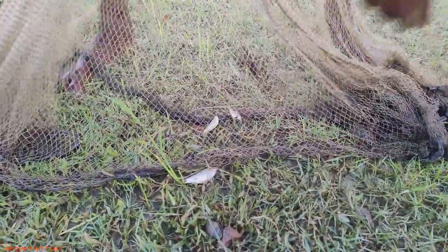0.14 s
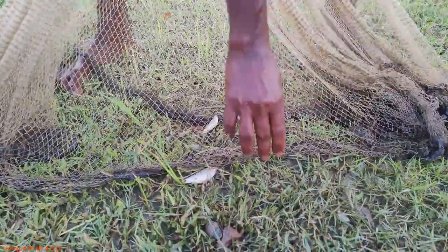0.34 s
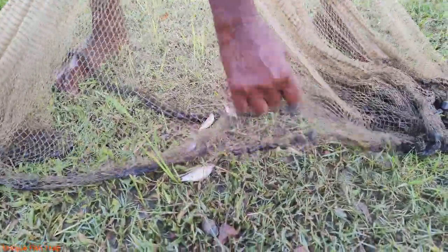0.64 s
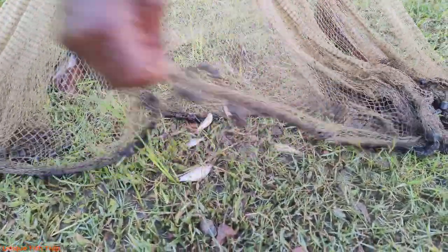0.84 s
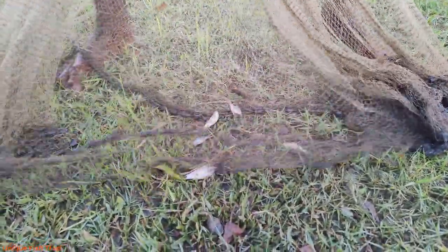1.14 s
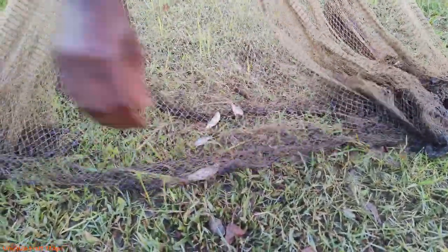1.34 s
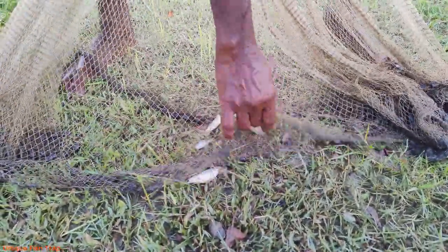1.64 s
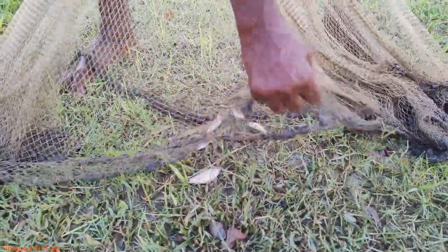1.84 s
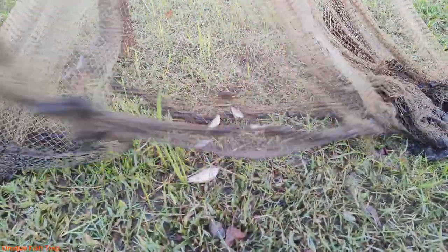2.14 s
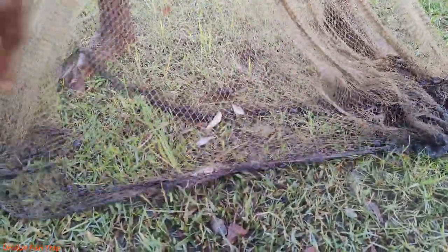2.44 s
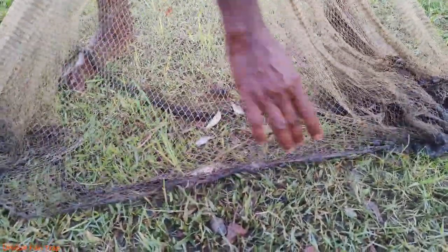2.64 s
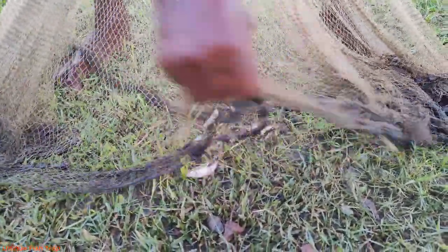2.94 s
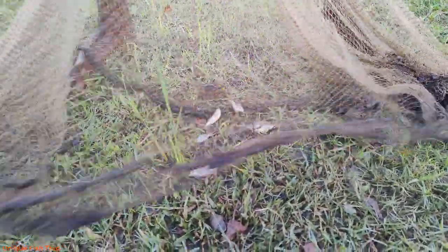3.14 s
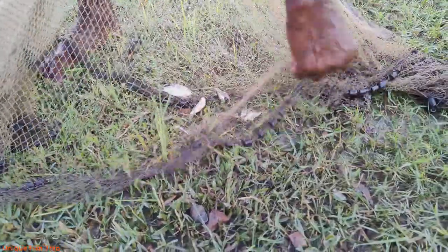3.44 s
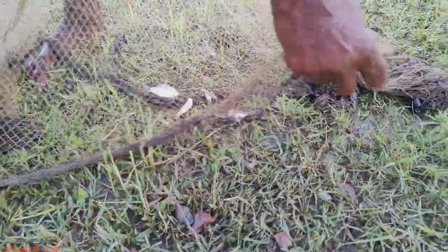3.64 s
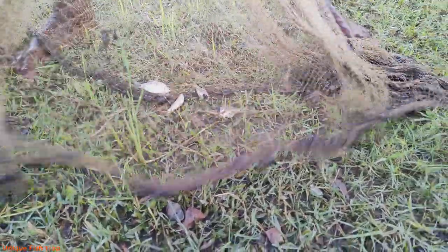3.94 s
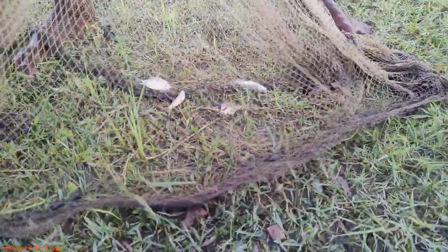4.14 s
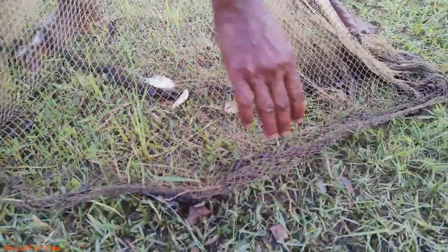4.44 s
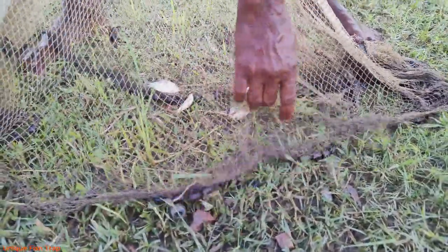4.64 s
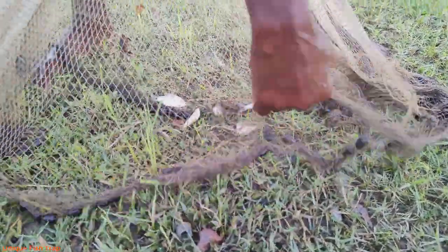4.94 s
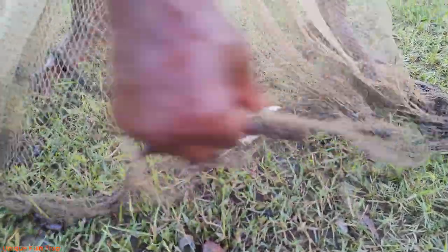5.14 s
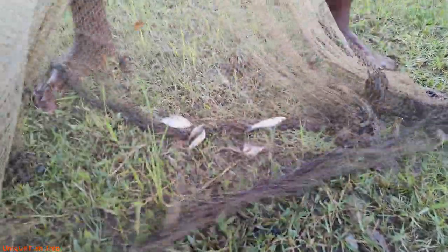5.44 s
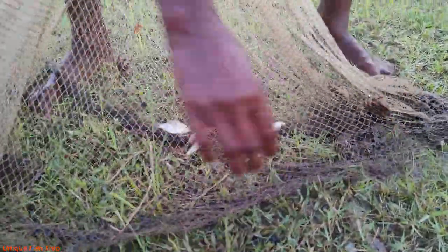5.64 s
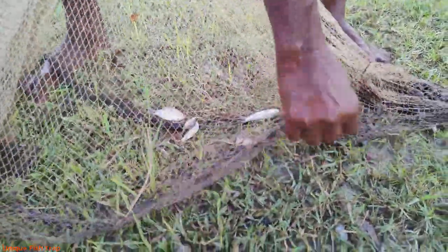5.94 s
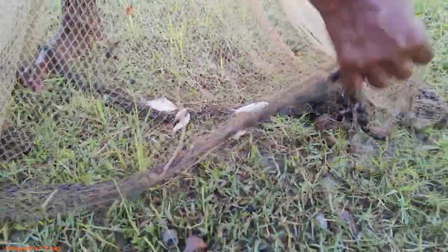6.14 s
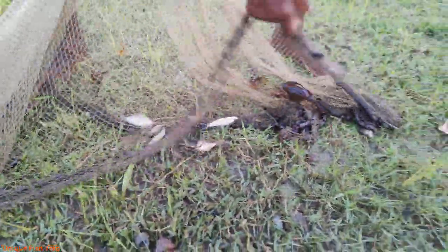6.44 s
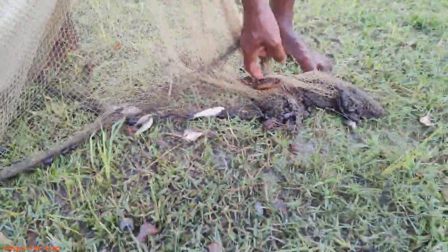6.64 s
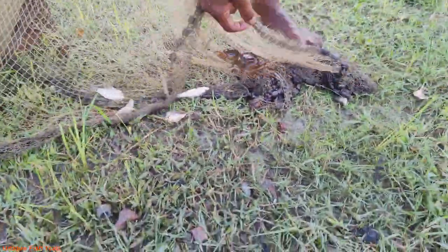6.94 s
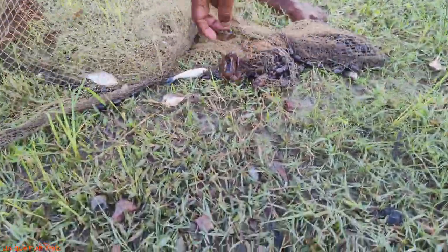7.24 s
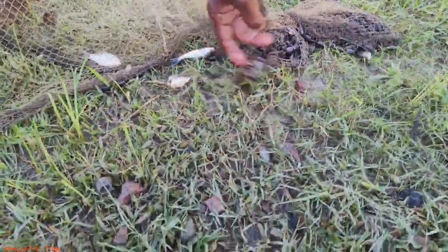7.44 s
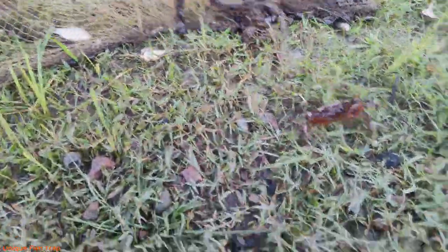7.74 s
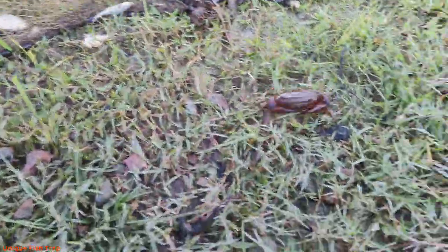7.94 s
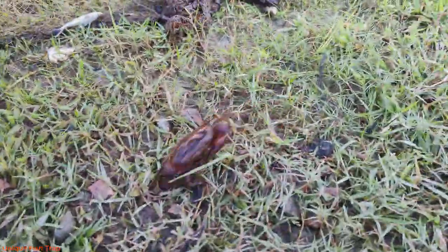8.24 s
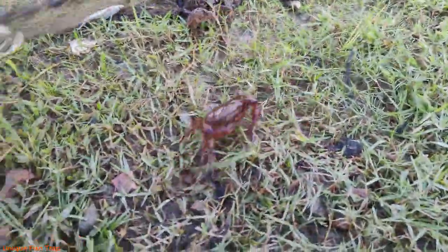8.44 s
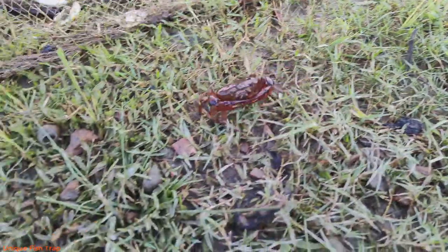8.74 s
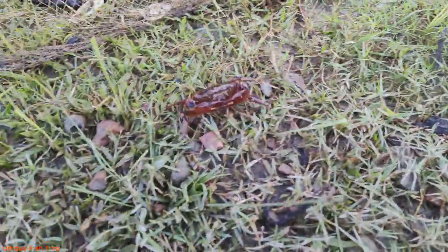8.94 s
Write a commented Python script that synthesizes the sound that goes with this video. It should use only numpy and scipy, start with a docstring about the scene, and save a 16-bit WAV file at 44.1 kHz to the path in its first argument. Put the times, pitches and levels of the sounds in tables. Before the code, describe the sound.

A wet nylon cast net is lifted and shaken by hand over grass, crackling and snapping sharply, with hard knocks and birds chirping around.

```python
"""Close by a two-port microphone, a hand lifts and shakes a wet cast net over grass for nine seconds.
Throughout, filtered noise gives low rumble, air and a high insect hiss; gliding tones make birds near and far.
Noise bursts snap from the first second and crowd near 1.4 s; a warble of swept tone follows at 1.6 s.
Pulls of rustling noise and snaps return near 2.6 s, with damped rings knocking hard at 4.3 and 5.7 s.
Air thumps a port as short swings at 6.7 and 8.1 s, stray ticks touch one side, and dense snaps end it."""
import sys
import numpy as np
from scipy import signal
from scipy.fft import rfft, irfft, next_fast_len
from scipy.io import wavfile
from scipy.ndimage import uniform_filter1d

SR = 44100
rng = np.random.default_rng(int(sys.argv[2]) if len(sys.argv) > 2 else 0)


def to_wav(s):
    """Save 16-bit WAV."""
    ch = np.atleast_2d(s).T  # columns
    pcm = np.round(np.clip(ch, -1, 1) * 32767)  # PCM
    wavfile.write(sys.argv[1], SR, pcm.astype(np.int16))


N = 400869

# Spectrum of the open air around the microphone: (frequency [Hz], relative density [dB per Hz])
FIELD_SPECTRUM = [(15, -37), (25, -0.5), (70, 3), (157, -2), (427, -19), (1190, -28.5), (2480, -23.5),
                  (3250, -17), (4140, -23.5), (5140, -33), (10700, -26.5), (11900, -42), (16000, -30)]
# Far birds: (time [s], level [dB])
FAR_BIRD_LEVEL = [(0.0, -31.5), (0.2, -53.5), (0.55, -56.5), (1.07, -38.5), (1.45, -47), (1.68, -54),
                  (1.9, -42.5), (2.79, -37.5), (3.1, -52), (3.47, -35), (3.87, -52), (4.3, -34.5),
                  (4.54, -44.5), (4.88, -39), (5.65, -39.5), (5.95, -45.5), (6.68, -40), (7.74, -40.5),
                  (7.93, -43), (8.75, -31.5), (8.87, -50), (9.09, -50)]
# Near birds: (start [s], end [s], first pitch [Hz], last pitch [Hz],
# bend [exponent, above 1 glides early], level before flutter and echo [dB])
NEAR_WHISTLES = [(0.016, 0.102, 3230, 2652, 2.4, -38), (.045, 0.069, 3430, 3530, 1.1, -48),
                 (0.53, 0.577, 4330, 4270, 1.1, -49), (.68, 0.747, 3530, 3320, 1.4, -49),
                 (0.794, 0.81, 3320, 3240, 1.1, -51), (0.802, 0.916, 2190, 2910, 0.86, -43),
                 (1.025, 1.085, 4180, 3560, 0.93, -38), (0.951, 0.988, 2625, 2910, 0.71, -39),
                 (1.82, 1.905, 4870, 3980, 0.94, -38), (1.814, 1.887, 4250, 3420, 0.55, -39.5),
                 (2.506, 2.532, 5100, 4200, 1.1, -38), (2.529, 2.592, 4200, 3830, 3.6, -28.5),
                 (2.688, 2.743, 5660, 4500, 0.97, -40.5), (2.735, 2.813, 4330, 3727, 6.9, -30),
                 (2.77, 2.797, 4500, 4900, 1.1, -40), (2.714, 2.763, 3000, 2830, 1.16, -38),
                 (2.8, 2.863, 3500, 3174, 4.2, -27.5), (2.882, 2.959, 5820, 4500, .7, -42.5),
                 (2.944, 3.021, 4500, 3660, 5.5, -34.5), (3.498, 3.56, 3540, 3100, 1.7, -40),
                 (4.71, 4.75, 4870, 4800, 1.1, -55), (4.848, 4.903, 3080, 2730, 1.27, -35.5),
                 (4.928, 4.947, 4220, 4600, 1.2, -37), (4.951, 5.02, 3450, 3080, 2.4, -30.5),
                 (5.19, 5.226, 2750, 2890, 1.3, -39), (5.818, 5.845, 5200, 6000, 2.1, -45.5),
                 (5.846, 5.981, 5990, 3530, 1.5, -46), (5.846, 5.923, 3010, 2910, 0.5, -42),
                 (6.09, 6.195, 2950, 3940, 0.88, -40.5), (6.615, 6.737, 2804, 3630, 1.14, -41),
                 (7.351, 7.42, 3040, 3100, 1.4, -47.5), (7.668, 7.749, 4580, 3005, 2.4, -37.5),
                 (7.887, 7.932, 4720, 4680, 0.39, -41.5), (8.065, 8.097, 4400, 4500, 0.94, -43),
                 (8.246, 8.307, 3195, 3030, 0.9, -34), (8.862, 8.935, 3930, 4020, 1.24, -49)]
# One low warble: (start [s], end [s], period [s], top [Hz], bottom [Hz], final level before flutter and echo [dB])
WARBLE = (1.609, 1.757, .037, 3400, 2080, -43.5)
# Air on the ports: (time [s], strength [dB], swing [Hz], left minus right [dB])
AIR_PUFFS = [(1.077, -31, 120, -10), (4.248, -31, 186, -1), (5.601, -25, 153, -4), (5.683, -25.5, 157, -14),
             (6.641, -26, 120, -16), (6.658, -21, 202, -24), (6.677, -29, 120, -18),
             (6.797, -27.5, 211, -16), (6.82, -22, 151, -28), (8.052, -35.5, 120, -12),
             (8.079, -25.5, 132, -22), (8.101, -22.5, 120, -24), (8.125, -27, 143, -19),
             (8.15, -22, 259, -20), (8.172, -23, 170, -25), (8.686, -21.5, 179, -4), (8.868, -31, 88, -8)]
# Droplets or grit flicked onto one port:
# (time [s], strength [dB], width [ms], ring [Hz], left minus right [dB])
PORT_TICKS = [(2.6058, -7.5, 0.084, 400, -29), (5.8434, -21, 0.27, 2290, -29),
              (8.5457, -7.5, 0.092, 350, 33), (8.8783, -10, 0.25, 1940, -34)]
# Weighted hem, sinkers and fish bodies meeting each other or the turf:
# (time [s], strength [dB], left minus right [dB], pitch [Hz])
HEM_KNOCKS = [(0.325, -21, 0, 476), (0.3356, -13.5, 7, 2680), (0.51, -39, 1, 960), (0.912, -28, -1, 1470),
              (1.1533, -18, 2, 2360), (1.364, -20, 8, 2376), (1.4606, -26, 0, 2480),
              (2.0714, -24.5, 2, 1630), (2.086, -12, 0, 1453), (2.632, -20, 25, 820),
              (2.6448, -22.5, 0, 2580), (2.6575, -20, 6, 2130), (3.5378, -27.5, 0, 1100),
              (4.2737, -2.5, 4, 2545), (4.3239, -13, 6, 2454), (4.3608, -22, 8, 2310),
              (4.3796, -23.5, -2, 2090), (5.6353, -9.5, -4, 2120), (5.6926, -4.5, -8, 1960),
              (5.7072, -12, 2, 2313), (6.5363, -18, 32, 2620), (6.8003, -28.5, -11, 630),
              (6.855, -36, 1, 984), (7.0668, -16, 5, 2683), (7.5699, -26, -5, 1023), (7.581, -24, 3, 1856),
              (7.6382, -33, 4, 1484), (7.744, -11.5, 0, 1975), (8.4383, -20, 14, 2550),
              (8.6474, -23, -4, 2170), (8.6565, -18, -3, 2680), (8.6759, -19.5, -15, 2490),
              (8.7648, -22, 7, 2630), (8.7785, -5, -2, 2077), (8.795, -15.5, 6, 1790),
              (8.8044, -20.5, 0, 2330), (8.8158, -10, -7, 2340)]
# Pulls of the hand through the grass: (stop [s], length [s], rise, or fade if negative [dB],
# final mesh level [dB], final wet hem cord level [dB])
HAND_PULLS = [(0.012, 0.015, -19, -37, -46), (0.263, 0.035, 10, -30, -70), (0.354, 0.074, 22, -35, -29.5),
              (1.314, 0.53, 5.5, -35.5, -44), (1.423, 0.066, 7, -25, -29), (1.94, 0.14, 5, -38, -80),
              (2.481, 0.42, 3.5, -28.5, -49), (2.645, 0.11, 14.5, -28, -38), (3.136, 0.29, 0.5, -36.5, -54),
              (3.36, 0.17, 5, -37, -46), (3.914, 0.42, -4, -43.5, -46), (4.172, 0.21, 19, -19.5, -37),
              (4.376, 0.21, 10.5, -26.5, -28.5), (5.083, 0.27, -3, -43.5, -49.5),
              (5.532, 0.37, -7, -36, -50), (5.647, 0.11, 13.5, -19.5, -20),
              (6.527, 0.64, 20.5, -33.5, -36.5), (7.24, 0.75, -7.5, -42, -46), (7.619, 0.23, 29, -33, -32),
              (8.307, 0.51, 19.5, -37.5, -37), (8.385, .05, 6.5, -27.5, -31.5),
              (8.491, 0.049, 7.5, -24.5, -42), (8.66, 0.094, -1.5, -29, -37.5),
              (8.81, 0.13, -0.5, -31.5, -24)]
# Knots and wet threads letting go, the clear ones: (time [s], strength [dB], t60 [ms])
KNOT_SNAPS = [(0.098, -25, 14), (0.229, -22.5, 48), (0.252, -12, 33), (0.326, -11, 120),
              (0.3337, -12.5, 104), (0.342, -16, 28), (0.3658, -17.5, 89), (0.376, -15, 37),
              (0.508, -27.5, 55), (0.691, -28, 39), (0.894, -26, 130), (1.1014, -18.5, 16),
              (1.1107, -17.5, 17), (1.227, -25.5, 20), (1.3636, -6.5, 13), (1.3764, -14, 13),
              (1.3824, -14, 62), (1.4095, -20, 42), (1.4239, -11, 13), (1.447, -19, 19), (1.456, -15.5, 12),
              (1.462, -12, 22), (1.4745, -14, 23), (1.4844, -12.5, 22), (1.49, -10, 20), (1.5, -12, 20),
              (1.509, -19.5, 45), (2.0838, -11.5, 26), (2.1296, -22, 21), (2.2052, -16.5, 36),
              (2.219, -21, 17), (2.2446, -16, 22), (2.2541, -14.5, 18), (2.431, -11, 18), (2.4587, -13, 19),
              (2.4775, -21, 14), (2.4884, -15, 52), (2.579, -20, 17), (2.6044, -12, 42), (2.6315, -5.5, 26),
              (2.6431, -5.5, 56), (2.6586, -11, 10), (2.669, -22, 51), (2.998, -20, 44),
              (3.0184, -22.5, 44), (3.066, -21, 43), (3.074, -10.5, 19), (3.106, -13.5, 54),
              (3.13, -23, 68), (3.273, -12, 30), (3.3198, -22.5, 34), (3.5456, -21.5, 46),
              (3.8847, -28, 24), (3.951, -24, 53), (4.0603, -24, 23), (4.078, -19, 43), (4.134, -25, 15),
              (4.1552, -23, 11), (4.243, -25, 20), (4.274, -8, 31), (4.3251, -6, 33), (4.3348, -18, 23),
              (4.3546, -11, 71), (4.3584, -15, 22), (4.3664, -14, 56), (4.38, -10.5, 41), (4.411, -21, 12),
              (5.0891, -18, 28), (5.171, -18.5, 34), (5.252, -19, 47), (5.3333, -28, 17), (5.3876, -19, 42),
              (5.411, -22.5, 32), (5.594, -10.5, 16), (5.6222, -13.5, 33), (5.634, -24, 34),
              (5.6568, -15, 26), (5.6903, -9, 146), (5.6957, -20, 50), (5.706, -5.5, 40), (6.257, -30, 29),
              (6.5357, -10.5, 29), (6.5793, -27.5, 40), (6.8033, -28, 25), (6.8116, -26, 50),
              (6.9766, -22, 35), (7.0662, -11, 21), (7.142, -15, 38), (7.1761, -11.5, 38),
              (7.6984, -25.5, 18), (7.7435, -13.5, 44), (8.257, -23, 21), (8.2751, -22.5, 20),
              (8.342, -13.5, 31), (8.3568, -12, 35), (8.377, -18.5, 48), (8.387, -21, 17),
              (8.438, -8.5, 16), (8.452, -15, 12), (8.4626, -23, 22), (8.4894, -17, 16), (8.509, -25, 21),
              (8.5455, -14.5, 24), (8.5683, -24, 25), (8.609, -24, 19), (8.6284, -17.5, 8.9),
              (8.6651, -13.5, 29), (8.676, -14, 28), (8.6882, -13.5, 21), (8.699, -21, 54),
              (8.721, -17, 55), (8.736, -12.5, 28), (8.7468, -11, 13), (8.768, -19.5, 33),
              (8.7747, -13, 93), (8.784, -5.5, 32), (8.796, -16, 58), (8.8163, -7, 26)]
# Spectrum of wet nylon: (frequency [Hz], relative density [dB per Hz])
NYLON_SPECTRUM = [(290, -25), (500, -18.5), (1280, -28), (2070, -9), (2330, -18.5), (2540, -4.5),
                  (3250, -2.5), (4030, 3), (4940, -4.5), (6060, 2.5), (7210, -2), (9630, 2), (12900, -4.5),
                  (14900, -1.5), (16000, -1)]
# Where the hand works the net: (time [s], left minus right [dB])
HAND_POSITION = [(0.0, -2), (4.05, -0.5), (6.12, -1.5), (7.22, -1.5), (8.62, 0.5), (9.09, 2)]
# Edges between the independently tinted bands of a snap: (frequency [Hz])
SNAP_EDGES_HZ = (4800, 8500, 12000)

FIELD_DB = -44.5  # before the slow swell and the tilt between ports
INSECT_HZ, INSECT_WIDTH_HZ = 11000, 300
INSECT_DB = -59  # before its fluctuation
FLUTTER_DB, CLEAR_ABOVE_DB = 7, -33  # scale of the flutter; louder whistles escape it
# hard knocks are damped sooner: t60 at 0 dB, and what each dB softer adds
KNOCK_T60_MS, SOFTER_MS_PER_DB = 13.1, 1.84
PORT_LAG_TURNS = 0.49  # widest phase gap of a ring between the ports
TAKE_UP_DB_PER_S, LET_GO_DB_PER_S = 350, 300
SLACK_DB = -73  # floor under the pulls
SNAP_TINT_DB = 2.5  # spread of snap colour, before levelling
TOP_HZ = 15700


def undb(db):
    """Turn decibels into amplitude gain."""
    return 10 ** (np.asarray(db) / 20)


def unit(x):
    """Scale to an RMS of one."""
    return x / np.sqrt(np.mean(x ** 2))


def curve(table):
    """Gain over time from rows of (time [s], level [dB])."""
    return undb(np.interp(np.arange(N) / SR, *np.transpose(table)))


def colour(x, points):
    """Shape x by (frequency [Hz], density [dB]) points; white noise keeps its level."""
    size = next_fast_len(N)
    hz, db = np.transpose(points)
    bins_hz = np.arange(size // 2 + 1) * SR / size
    gain = undb(np.interp(np.log(bins_hz + 1), np.log(hz), db))
    gain /= np.sqrt(np.mean(gain ** 2))
    return irfft(rfft(x, size) * gain, size)[..., :N]


def band(x, hz, width_hz):
    """Pass x through one resonance."""
    return signal.lfilter(*signal.iirpeak(hz, hz / width_hz, SR), x)


def walk(rate):
    """Random levels held 1 / rate s and slewed twice."""
    hold = int(SR / rate)
    steps = np.repeat(rng.standard_normal(N // hold + 1), hold)
    return uniform_filter1d(uniform_filter1d(steps, hold), hold)[:N]


def add(out, s, sound, pan_db):
    """Mix a short sound into both channels at time s, with the total power kept across pans."""
    start = max(int(s * SR), 0)
    end = min(start + sound.shape[-1], N)
    ratio = undb(pan_db)
    sides = np.array([[ratio], [1]]) * np.sqrt(2 / (1 + ratio ** 2))
    out[:, start:end] += sound[..., :end - start] * sides


def whistle(length, first_hz, last_hz, bend, phase):
    """A gliding near-sine note with soft ends."""
    u = np.arange(int(length * SR)) / (length * SR)
    hz = last_hz + (first_hz - last_hz) * (1 - u) ** bend
    tone = np.sin(2 * np.pi * (np.cumsum(hz) / SR + phase))
    return np.sqrt(2) * np.sin(np.pi * u) ** 0.29 * tone


def scatter(x, t60, wet_db):
    """Trees and ground return a short diffuse tail, different at each port."""
    t = np.arange(int(t60 * SR)) / SR
    tail = rng.standard_normal((2, len(t))) * undb(-60 * t / t60)
    tail /= np.sqrt(np.sum(tail ** 2, axis=1, keepdims=True))
    return x + undb(wet_db) * signal.fftconvolve(x, tail, axes=1)[:, :N]


def burst(db, t60_ms, rise_ms):
    """Envelope that swells briefly and dies away, with its time axis."""
    t = np.arange(int(t60_ms / 1000 * SR)) / SR
    shape = undb(-60000 * t / t60_ms) * (1 - np.exp(-1000 * t / rise_ms)) ** 2
    return t, undb(db) * shape / shape.max()


def field():
    """Rumble partly shared by both ports, airy hiss that is not, and a narrow insect band."""
    mid, side = rng.standard_normal((2, N))
    # less difference in the lows makes the ports agree there
    side = side - .5 * signal.lfilter(*signal.butter(1, 600, fs=SR), side)
    air = colour(np.array([mid + side, mid - side]), FIELD_SPECTRUM)
    swell_db = 1.5 * walk(3)
    tilt_db = np.array([[-1.8], [1.8]])
    insects = unit(band(rng.standard_normal((2, N)), INSECT_HZ, INSECT_WIDTH_HZ))
    insects *= undb(INSECT_DB + 5.1 * walk(13))
    return unit(air) * undb(FIELD_DB + swell_db + tilt_db) + insects


def far_birds():
    """Many short overlapping notes spread left and right, blurred by a strong diffuse tail."""
    out = np.zeros((2, N))
    for when, length, pitch, lift, glide, size, side in rng.random((3000, 7)):
        hz = 2600 + 650 * pitch + 1050 * lift ** 1.5
        first_hz = hz * (1 + .25 * (glide - .4))
        # size sets both the starting phase and the loudness
        note = whistle(.007 + .022 * length ** 2, first_hz, hz, 1.5, size)
        add(out, when * N / SR, note * undb(20 * size), 10 * (side - .6))
    return unit(scatter(out, t60=.15, wet_db=7.5)) * curve(FAR_BIRD_LEVEL)


def warble():
    """A tone swept between sharp tops and low troughs, with an overtone in the troughs."""
    start, end, period, top_hz, bottom_hz, db = WARBLE
    t = np.arange(int((end - start) * SR)) / SR
    sweep = np.abs(2 * (t / period % 1) ** 1.5 - 1) ** 1.6
    hz = bottom_hz + (top_hz - bottom_hz) * sweep
    phase = 2 * np.pi * np.cumsum(hz) / SR
    overtone = .5 * ((hz < 2400) * np.sin(2 * phase))
    return start, undb(db - 7 * (1 - t / t[-1])) * (np.sin(phase) + overtone)


def near_birds():
    """Gliding whistles and one warble; moving air makes all but the nearest flutter."""
    distant, clear = np.zeros((2, 2, N))
    for s, end, first_hz, last_hz, bend, db in NEAR_WHISTLES:
        layer = clear if db > CLEAR_ABOVE_DB else distant
        add(layer, s, undb(db) * whistle(end - s, first_hz, last_hz, bend, 0), -5.5)
    add(distant, *warble(), -3)
    flutter = unit(undb(FLUTTER_DB * walk(170)))
    return scatter(distant * flutter, t60=0.3, wet_db=0.4) + scatter(clear, t60=0.2, wet_db=-10.5)


def puffs():
    """Air pushed past a port: a swing and its rebound."""
    out = np.zeros((2, N))
    t = np.arange(-.015, .03, 1 / SR)
    for s, db, hz, pan_db in AIR_PUFFS:
        cycles = hz * t
        # quick onset, slower release
        window = np.exp(-(cycles / np.where(cycles < 0, .3, .7)) ** 2)
        add(out, s + t[0], -undb(db) * np.sin(2 * np.pi * cycles) * window, pan_db)
    return out


def ticks():
    """A droplet or grain on a port gives a single short push with a slow rebound."""
    out = np.zeros((2, N))
    ms = np.arange(-1, 4, 1000 / SR)
    for s, db, width_ms, hz, pan_db in PORT_TICKS:
        push = np.exp(-(ms / width_ms) ** 2 / 2) * np.cos(2 * np.pi * hz * ms / 1000)
        rebound = 0.14 * np.exp(-((ms - .8) / 0.27) ** 2)
        add(out, s + ms[0] / 1000, undb(db) * (push - rebound), pan_db)
    return out


def knocks():
    """A damped, split ring at the pitch of the struck body, roughened by wet contact."""
    out = np.zeros((2, N))
    count = len(HEM_KNOCKS)
    # one phase per partial, plus a lag of its own at each port
    phases = rng.random((count, 4, 1, 1)) + PORT_LAG_TURNS * rng.random((count, 4, 2, 1))
    for (s, db, pan_db, hz), phase in zip(HEM_KNOCKS, phases):
        t, shape = burst(db, KNOCK_T60_MS - SOFTER_MS_PER_DB * db, rise_ms=0.23)
        partials = zip((1, .76, 1.17, 0.448), (1, 0.51, 0.7, 0.13), phase)
        ring = sum(size * np.sin(2 * np.pi * (ratio * hz * t + turn)) for ratio, size, turn in partials)
        add(out, s, shape * ring, pan_db)
    rough = band(rng.standard_normal((2, N)), 230, 630)
    return out * (0.39 + 0.27 * unit(rough))


def drag():
    """Gains of mesh and cord: every pull takes up quickly, rises or fades evenly in dB and lets go."""
    t = np.arange(0, N / SR + .002, .002)
    power = np.full((2, len(t)), undb(2 * SLACK_DB))
    for stop, length, swell_db, mesh_db, cord_db in HAND_PULLS:
        start = stop - length
        db = np.interp(t, [start - 1, start, stop, stop + 1],
                       [-swell_db - TAKE_UP_DB_PER_S, -swell_db, 0, -LET_GO_DB_PER_S])
        power += undb(2 * (db + np.array([[mesh_db], [cord_db]])))
    return [np.interp(np.arange(N) / SR, t, np.sqrt(p)) for p in power]


def snap_envelopes():
    """Each release is a crack and a decaying spray, weighted at random in every band."""
    snaps = np.zeros((len(SNAP_EDGES_HZ) + 1, 2, N))
    # no two knots ring alike
    tints = unit(undb(SNAP_TINT_DB * rng.standard_normal((len(KNOT_SNAPS), len(snaps)))))
    for (s, db, t60_ms), tint in zip(KNOT_SNAPS, tints):
        t, shape = burst(db, t60_ms, rise_ms=0.52)
        crack_and_spray = shape * (0.8 + 1.2 * np.exp(-t / 0.0011))
        for layer, gain in zip(snaps, tint):
            add(layer, s, gain * crack_and_spray, 0)
    return snaps


def slip_grain():
    """Threads slip off grass blades about 350 times a second, mostly weakly, each dying away."""
    chance = rng.random((2, N))
    slips = (chance[0] < 350 / SR) * undb(-4.4 * np.log(1 - chance[1]))
    crackle = signal.lfilter([1], [1, -undb(-60 / (0.024 * SR))], slips)
    return unit(1.3 + crackle)


def tinted(snaps, hiss):
    """Each band of the hiss, split at SNAP_EDGES_HZ, follows its own set of snap envelopes."""
    lows = []
    for hz in SNAP_EDGES_HZ:
        lowpass = signal.butter(2, hz, fs=SR, output="sos")
        lows.append(signal.sosfiltfilt(lowpass, hiss))
    bands = np.diff([0 * hiss] + lows + [hiss], axis=0)
    return np.sum(snaps * bands, axis=0)


def net():
    """Snaps gate the hiss of wet nylon; the drag adds crackling mesh and hem cord."""
    snaps = snap_envelopes()
    grain = slip_grain()
    # the releases come in clumps under a millisecond long
    clumps = unit(undb(3 * walk(2000)))
    hiss = colour(clumps * rng.standard_normal((2, N)), NYLON_SPECTRUM)
    cord = unit(band(band(rng.standard_normal((2, N)), 2990, 2450), 2970, 2600))
    mesh_gain, hem_gain = drag()
    side = np.sqrt(curve(HAND_POSITION))
    rustle = mesh_gain * grain * hiss + hem_gain * grain * cord
    return (tinted(snaps, hiss) + rustle) * np.array([side, 1 / side])


def scene():
    """The place, its birds, the air on the ports, then the net close by."""
    return field() + far_birds() + near_birds() + puffs() + ticks() + knocks() + net()


def record(dry):
    """The microphone clips whatever passes full scale, then cuts the top."""
    top_cut = signal.ellip(10, .2, 70, TOP_HZ, fs=SR, output="sos")
    return signal.sosfilt(top_cut, np.clip(dry, -1, 1))


dry = scene()
out = record(dry)
to_wav(out)
```